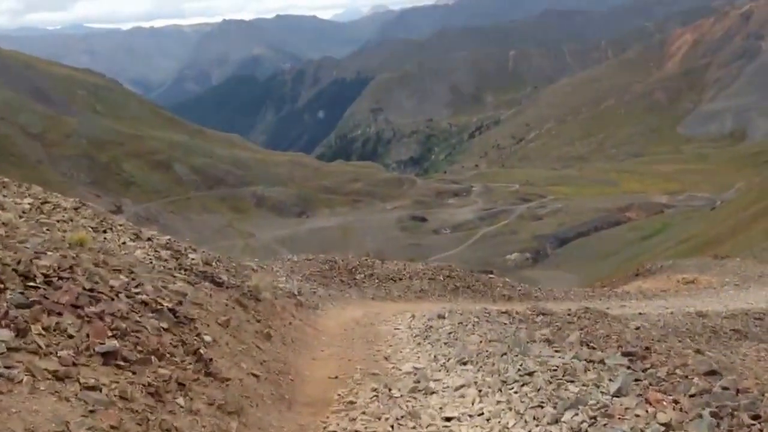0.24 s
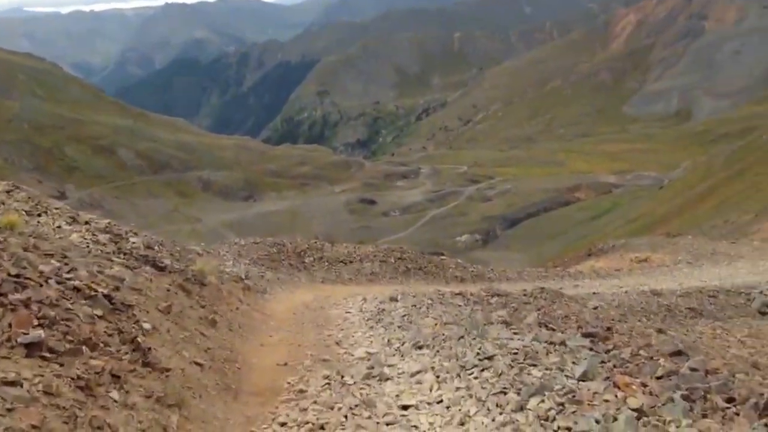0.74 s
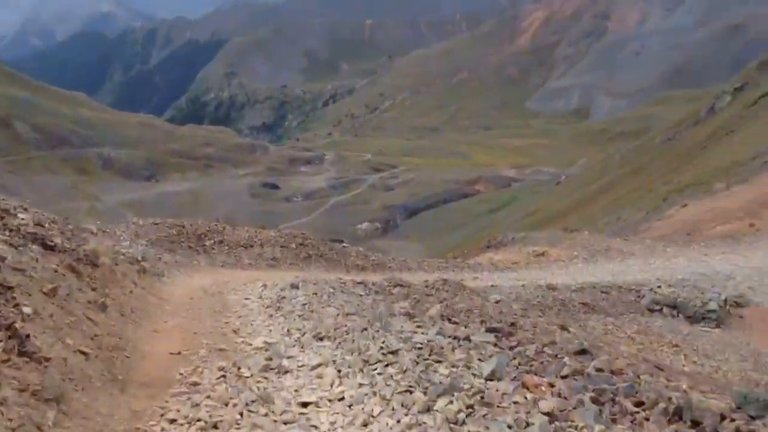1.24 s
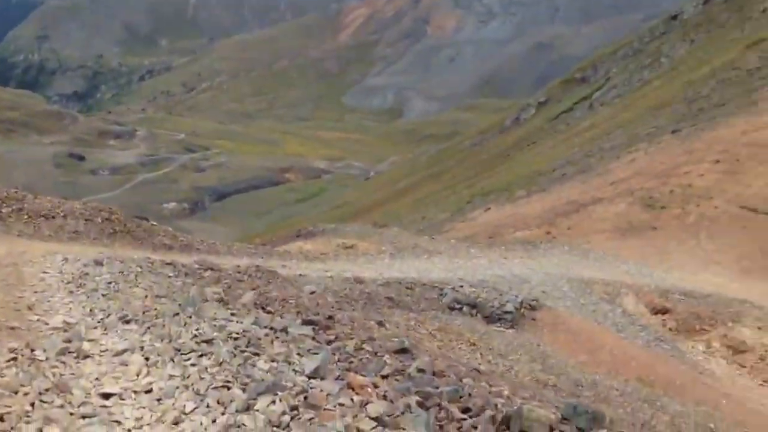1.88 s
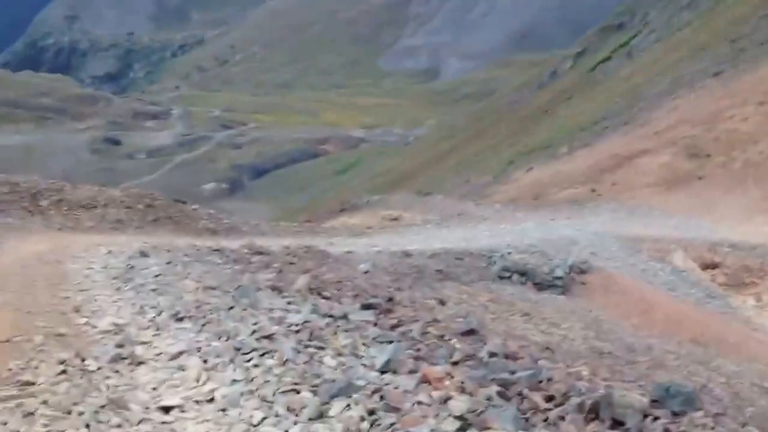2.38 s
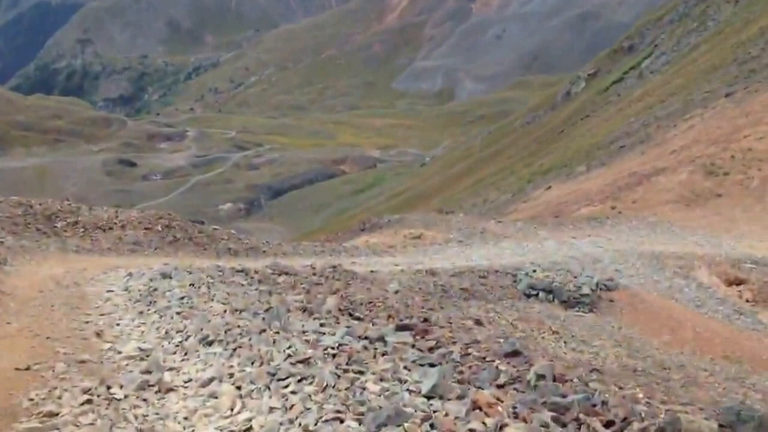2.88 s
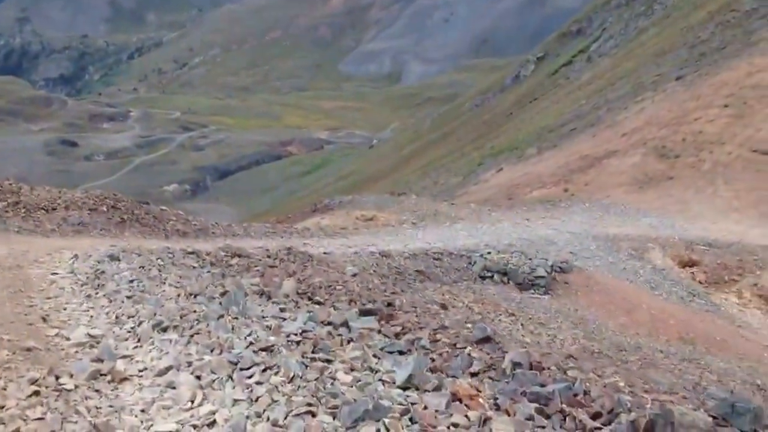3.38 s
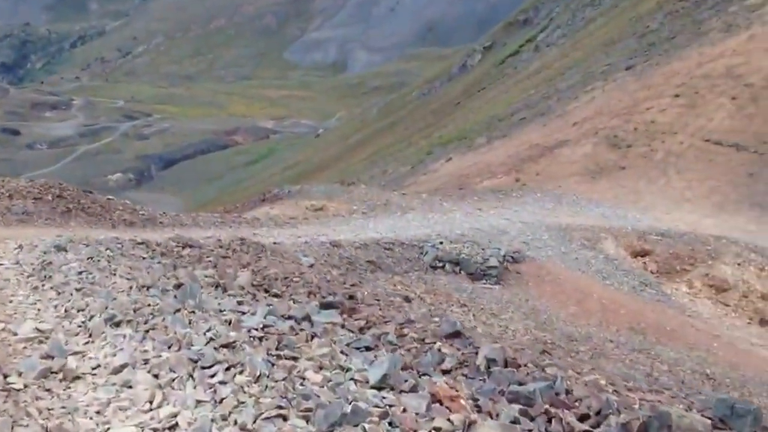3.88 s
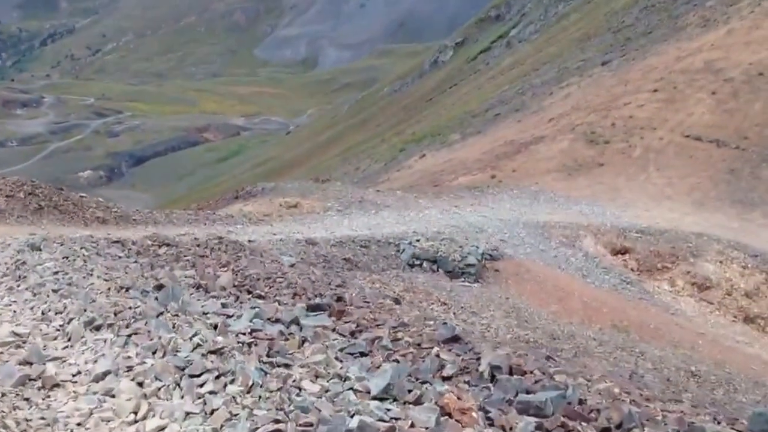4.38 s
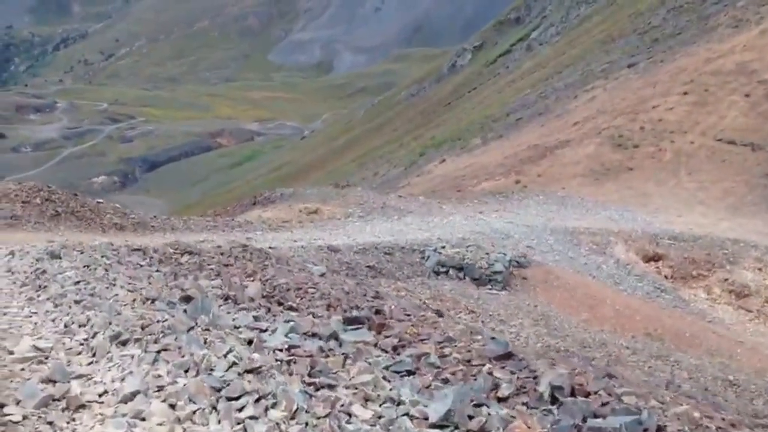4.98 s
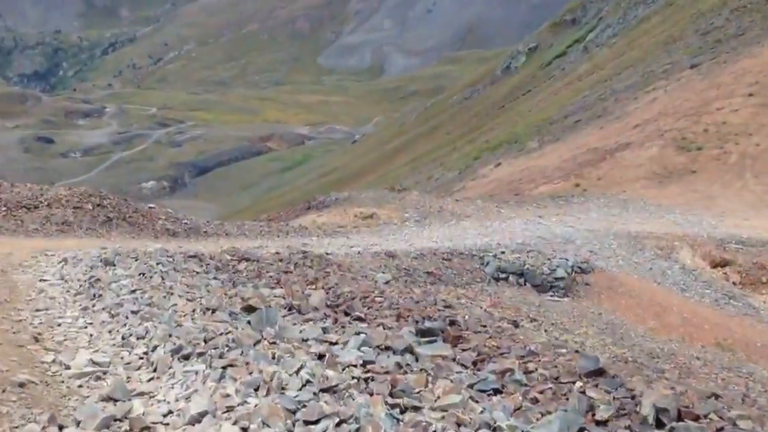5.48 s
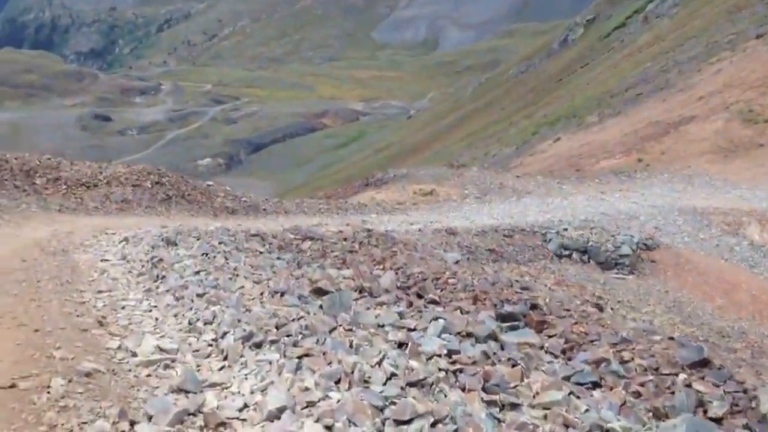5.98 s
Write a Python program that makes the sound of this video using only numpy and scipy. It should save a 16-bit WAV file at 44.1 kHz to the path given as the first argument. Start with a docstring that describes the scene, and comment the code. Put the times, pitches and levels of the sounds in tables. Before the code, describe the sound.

On board an off-road vehicle creeping down an open mountain track, tyres rumble and grind over loose sharp stones with fine clatter, crunches and slab scrapes. A low unsteady engine drone sits underneath. Shortly after two seconds a hard knock hits beside the microphone, the sound ducks and slowly recovers, then heavier body thuds follow.

```python
"""Off-road vehicle on loose stones

An off-road vehicle crawls down a track of loose, sharp stones, heard from on board.
Random stone contacts, filtered, make the tyre rumble, grind and fine clatter; all swell with the load.
Bursts of contacts ring stones that crunch, slabs that scrape and flakes that snap; drops thud the body.
The engine is three unsteady sines; hiss is filtered noise.
One hard knock close to the microphone makes the recorder's gain control duck and slowly recover."""
import sys
import numpy as np
from scipy import signal
from scipy.fft import rfft, irfft
from scipy.io import wavfile

SR = 44100
rng = np.random.default_rng(int(sys.argv[2]) if len(sys.argv) > 2 else 0)


def digitize_waveform(pressure):
    """Quantize a signal to 16-bit integers and store it at the path in sys.argv[1].

    Rows of a 2-D input are taken as channels; values are limited to [-1, 1].
    """
    field = np.atleast_2d(pressure).T
    bounded = np.clip(field, -1, 1)
    quanta = np.round(bounded * 32767).astype(np.int16)
    wavfile.write(sys.argv[1], SR, quanta)


N = 275184
TIME = np.arange(N) / SR
CUTOFF_HZ = 15400

# how hard the tyres bear on the stones: (time [s], load re usual [dB])
LOAD = [(0, -4.5), (.55, 0), (1.25, -2), (1.45, 5.5), (1.94, 3), (2.3, 4.5), (2.48, -9.5), (2.68, -1.5),
        (3.03, 2), (3.22, -3.5), (3.9, -2), (5.17, -2.6), (5.36, 11), (5.62, -0.5), (6.24, 2)]
# level of the fine clatter before load and gain control; raised after the knock, where the gain is down:
# (time [s], level [dB])
CLATTER_LEVEL = [(0, -52.5), (1.4, -53.5), (2.1, -59), (2.42, -42.5), (2.68, -55), (3.55, -54.5),
                 (4.2, -52.5), (6.24, -54.5)]
# bigger stones crushed by the tread:
# (time [s], clack before trim [dB], splinter before trim [dB], collapse length [s], clack pitch [Hz])
CRUNCH_EVENTS = [(0.084, -50, -58.5, 0.024, 1900), (0.316, -47, -61, .028, 2300),
                 (0.525, -46, -62, 0.0077, 1278), (0.551, -50, -62.5, 0.014, 2330),
                 (0.642, -55, -63, 0.01, 2030), (0.81, -45.5, -56, 0.011, 2870),
                 (0.948, -44, -58.5, 0.0066, 2410), (1.308, -48, -58, 0.03, 3000),
                 (1.378, -47, -64, .03, 2470), (1.413, -49, -66, 0.082, 2040),
                 (1.677, -47.5, -53.5, 0.027, 2210), (1.914, -50, -58.5, 0.035, 2700),
                 (1.96, -51, -63, 0.0062, 2340), (2.042, -53, -60.5, 0.034, 2670),
                 (2.47, -51, -59, 0.057, 3800), (2.546, -56, -60.5, .011, 2750),
                 (2.835, -52.5, -66, 0.042, 2590), (3.738, -54, -72, 0.0097, 2920),
                 (3.828, -49, -57, 0.014, 2160), (4.06, -45.5, -58.5, 0.013, 1810),
                 (4.094, -50, -68, 0.018, 2200), (4.581, -44, -53.5, 0.014, 1700),
                 (4.708, -52, -68, 0.014, 2600), (4.749, -52, -62.5, 0.011, 2660),
                 (4.883, -47.5, -72, 0.033, 2350), (5.019, -47, -57, 0.045, 2610),
                 (5.045, -46, -61, .022, 2350), (5.154, -51, -65, 0.03, 2300),
                 (5.256, -49, -61, 0.009, 2300), (5.373, -45, -52.5, 0.012, 2105),
                 (5.887, -48.5, -69, 0.013, 2300), (6.005, -54.5, -74, .008, 2600),
                 (6.058, -47.5, -60.5, 0.082, 2280)]
# tyres dropping off bigger stones: (time [s], level [dB], contact brightness [Hz])
THUD_EVENTS = [(0.176, -43.5, 447), (0.32, -34, 300), (0.526, -35, 990), (0.608, -38.5, 750),
               (1.413, -34, 437), (1.571, -36, 447), (1.678, -35.5, 495), (2.472, -35, 520),
               (2.548, -33, 540), (2.92, -39, 600), (3.001, -36, 420), (3.056, -26, 170), (3.119, -35, 510),
               (3.21, -37.5, 380), (3.427, -36, 405), (3.454, -25, 312), (3.829, -32, 430),
               (3.97, -32, 216), (4.148, -37.5, 560), (4.33, -29, 437), (4.416, -33.5, 188),
               (4.579, -30, 290), (4.86, -33, 216), (5.373, -23.5, 396), (5.398, -28, 284),
               (6.074, -35.5, 517)]
# slabs shoved along under the tread: (time [s], level [dB], length [s])
SCRAPE_EVENTS = [(0.548, -40, 0.047), (0.975, -45.5, 0.049), (1.411, -43, 0.057), (1.575, -41, .055),
                 (1.68, -35.5, 0.058), (1.743, -41, .09), (1.928, -39, 0.028), (2.033, -39, 0.044),
                 (4.878, -41, .03), (5.25, -42, .045), (6.06, -40.5, .075)]
# thin flakes that snap with a bright tick: (time [s], level [dB])
FLAKE_EVENTS = [(1.677, -62), (4.062, -56), (5.651, -54)]

# modes of the vehicle's body, before contact weighting: (frequency [Hz], gain [dB], t60 [s])
BODY_MODES = [(154, -11, 0.073), (212, -2, 0.095), (281, -5, 0.13), (380, 4.5, 0.054), (441, -6, 0.12),
              (539, 1.5, 0.08), (664, -2, 0.036), (733, -0.5, 0.039), (930, 3.5, 0.019)]
# modes of the thing knocked beside the microphone, re crack peak: (frequency [Hz], gain [dB], t60 [s])
KNOCK_MODES = [(252, -8.5, 0.088), (405, -32.5, 0.17), (654, -43, 0.037)]

# tread drumming on the body: (frequency [Hz], relative gain [dB])
RUMBLE_SPECTRUM = [(30, -37), (70, -17), (88, -19.5), (99, -9.5), (110, -13.5), (130, -1.5), (160, 1.5),
                   (190, -3), (218, 1), (260, -6.5), (320, -10.5), (450, -18), (900, -54.5)]
# grinding of the stone bed, also grit: (frequency [Hz], relative gain [dB])
GRIND_SPECTRUM = [(200, -26.5), (320, -14.5), (372, 2.5), (430, -1.5), (530, -3), (700, -8.5), (920, -15.5),
                  (1060, -27.5), (1230, -16), (2000, -50), (5000, -32.5), (15000, -56)]
# fine clatter, also scrape grit: (frequency [Hz], relative gain [dB])
CLATTER_SPECTRUM = [(900, 4.5), (1230, 0.5), (1900, 4), (2800, -1.5), (4000, -7), (6000, -12),
                    (9000, -15.5), (15000, -55)]
# body of a crunch: (frequency [Hz], relative gain [dB])
CLACK_SPECTRUM = [(900, 4.5), (1300, -2.5), (3400, -8.5), (10000, -22)]
# bright part of a crunch: (frequency [Hz], relative gain [dB])
SPLINTER_SPECTRUM = [(1500, -34), (3200, 8.5), (4300, 7), (7500, -5), (15000, -23)]
# crack of the knock: (frequency [Hz], relative gain [dB])
CRACK_SPECTRUM = [(40, -31), (130, -13), (220, 11.5), (620, 8.5), (920, 1), (1080, -4.5), (1300, 0.5),
                  (2000, -3.5), (4000, -15.5), (7000, -28.5), (15000, -55)]
# background hiss: (frequency [Hz], relative gain [dB])
HISS_SPECTRUM = [(500, -9), (3000, 12.5), (6000, 5.5), (15000, 0.5)]

# rolling layers: level at the usual load, and dB gained per dB of load
RUMBLE_DB, RUMBLE_DB_PER_LOAD_DB = -39.5, 0.55
GRIND_DB, GRIND_DB_PER_LOAD_DB = -48, 0.75
CLATTER_DB_PER_LOAD_DB = 0.56
CLIMB_LOAD_DB, CLIMB_S = -2, 0.031  # lull before a slab: depth; lead and width
CLACK_TRIM_DB, SPLINTER_TRIM_DB = 2.5, 6.0
SNAP_SHARE, TRICKLE_S = 0.32, 0.04  # first snap re all contacts; decay of the trickle
# small crunches, levels before trim
SMALL_PER_S, SMALL_CLACK_DB, SMALL_SPLINTER_DB, SMALL_LENGTH_S = 11, -58.5, -72, 0.007
REBOUND_S, REBOUND_SHARE = 0.00542, 0.38  # second contact of a thud, re the first
BODY_SPREAD_OCTAVES = 0.05  # scatter of the modes from blow to blow
SLAB_LOW_HZ, SLAB_HIGH_HZ, SCRAPE_GRIT_SHARE = 302, 940, 0.23
KNOCK_S, KNOCK_DB, PRE_SWELL_DB = 2.3193, 0.5, -14.5
ENGINE_DB, FIRING_HZ, HISS_DB = -48.5, 48.74, -62


def from_db(db):
    """Decibels to gain."""
    return 10 ** (np.asarray(db) / 20)


def rms_one(x):
    """Scale to an rms of 1."""
    return x / np.sqrt(np.mean(x ** 2) + 1e-20)


def onset_one(x):
    """Scale a hit so that its first 20 ms have an rms of 1."""
    return x / np.sqrt(np.mean(x[:SR // 50] ** 2) + 1e-20)


def add(track, start_s, sound):
    """Mix a sound into the track at start_s."""
    start = max(0, round(start_s * SR))
    track[start:start + len(sound)] += sound[:N - start]


def drift(corner_hz):
    """Slow random wander with an rms of 1: two-pole low-passed noise."""
    step = 40  # samples between drawn values
    r = np.exp(-2 * np.pi * corner_hz * step / SR)
    noise = rng.standard_normal(N // step + 2002)
    slow = signal.lfilter([1], [1, -2 * r, r * r], noise)[2000:]  # drop the run-in
    return np.interp(np.arange(N) / step, np.arange(len(slow)), rms_one(slow))


def colour(x, spectrum, size=4096):
    """Causal minimum-phase filter with the given spectrum, built by folding its cepstrum."""
    hz, db = np.transpose(spectrum)
    grid_hz = np.maximum(np.fft.rfftfreq(size, 1 / SR), 1)
    gain_db = np.interp(np.log(grid_hz), np.log(hz), db)
    cepstrum = irfft(np.log(from_db(gain_db)))
    cepstrum[1:size // 2] *= 2
    cepstrum[size // 2 + 1:] = 0
    impulse = irfft(np.exp(rfft(cepstrum)))
    return signal.fftconvolve(x, impulse)[:len(x)]


def band(x, order, low_hz, high_hz):
    """Butterworth band-pass."""
    sos = signal.butter(order, [low_hz, high_hz], "band", fs=SR, output="sos")
    return signal.sosfilt(sos, x)


def ring(clicks, hz, t60_s):
    """Two-pole resonator: a unit click starts a decaying sine of height 1."""
    r = from_db(-60 / (t60_s * SR))
    w = 2 * np.pi * min(hz, CUTOFF_HZ) / SR
    return signal.lfilter([0, np.sin(w)], [1, -2 * r * np.cos(w), r * r], clicks + 1e-18)


def grains(per_s, spread_db, size):
    """Stone contacts at random moments and of random sign, most small and a few large."""
    strength = from_db(spread_db * np.minimum(rng.exponential(1, size), 4))
    hits = rng.random(size) < per_s / SR
    return hits * strength * rng.choice([-1, 1], size)


def stones(clicks, low_hz, high_hz, cycles, ring_share, count):
    """Each contact is a dry snap plus the ring of one of several stones, t60 in cycles."""
    dealt = rng.integers(0, count, len(clicks))
    places = (np.arange(count) + rng.random(count)) / count
    pitches_hz = low_hz * (high_hz / low_hz) ** places
    rings = sum(ring(clicks * (dealt == k), hz, cycles / hz) * hz for k, hz in enumerate(pitches_hz))
    share = np.clip(ring_share, 0, 1)
    return np.sqrt(share) * rms_one(rings) + np.sqrt(1 - share) * rms_one(clicks)


def rolling():
    """The tread drums the body, grinds over the bed and stirs a fine clatter; all swell with the load."""
    load_db = np.interp(TIME, *np.transpose(LOAD)) + climb_load_db()
    jolt_db = drift(28)

    # separate bumps from the tread blocks stand out of a finer patter
    bumps = rms_one(grains(90, 1.0, N)) + 1.17 * rms_one(grains(2000, 0.7, N))
    rumble_db = RUMBLE_DB + RUMBLE_DB_PER_LOAD_DB * load_db + 0.5 * jolt_db + 2.1 * drift(7.7)
    rumble = rms_one(colour(bumps, RUMBLE_SPECTRUM)) * from_db(rumble_db)

    grind_db = GRIND_DB + GRIND_DB_PER_LOAD_DB * load_db + jolt_db
    grind = rms_one(colour(grains(1100, 2.9, N), GRIND_SPECTRUM)) * from_db(grind_db)

    clatter_db = np.interp(TIME, *np.transpose(CLATTER_LEVEL))
    clatter_db = clatter_db + CLATTER_DB_PER_LOAD_DB * load_db + 1.7 * jolt_db
    clatter = fine_clatter(per_s=210, clump_db=2.5, cycles=19.6) * from_db(clatter_db)
    return rumble + grind + clatter


def climb_load_db():
    """The load dips briefly just ahead of each scrape, as the tyre rides up on the slab."""
    dips = (np.exp(-((TIME - s + CLIMB_S) / CLIMB_S) ** 2) for s, _, _ in SCRAPE_EVENTS)
    return CLIMB_LOAD_DB * sum(dips)


def fine_clatter(per_s, clump_db, cycles, count=14):
    """Stones of each size rub in clumps of their own, so the clatter shifts in pitch; dry ticks between."""
    rings = np.zeros(N)
    for hz in np.geomspace(900, 7000, count):
        clumps = from_db(clump_db * np.minimum(drift(16.0), 2))
        rubs = grains(per_s, 0.85, N) * clumps
        rings += ring(rubs, hz, cycles / hz) * np.sqrt(hz)
    ticks = grains(1400, 2.7, N)
    return rms_one(colour(rms_one(rings) + 1.2 * rms_one(ticks), CLATTER_SPECTRUM))


def crunches(rows, size=8000):
    """A stone gives way in a snap, a burst and a trickle of contacts: pitched clack, bright splinters."""
    out, t = np.zeros(N), TIME[:size]
    for start_s, clack_db, splinter_db, length_s, hz in rows:
        burst = grains(2600, 1.7, size) * np.exp(-(t / length_s) ** 2)
        trickle = grains(550, 1.54, size) * np.exp(-t / TRICKLE_S)
        contacts = burst + trickle
        contacts[0] = SNAP_SHARE * np.linalg.norm(contacts)
        clack = stones(contacts, hz / 1.4, hz * 1.4, cycles=82, ring_share=0.85, count=6)
        clack = onset_one(colour(clack, CLACK_SPECTRUM))
        splinter = stones(contacts, 3600, 9460, cycles=104, ring_share=0.33, count=8)
        splinter = onset_one(colour(splinter, SPLINTER_SPECTRUM))
        add(out, start_s, from_db(clack_db + CLACK_TRIM_DB) * clack)
        add(out, start_s, from_db(splinter_db + SPLINTER_TRIM_DB) * splinter)
    return out


def small_crunches():
    """One small stone gives way at random in each equal slot of time; rows as in CRUNCH_EVENTS."""
    return [((k + rng.random()) / SMALL_PER_S, SMALL_CLACK_DB, SMALL_SPLINTER_DB,
             SMALL_LENGTH_S, rng.uniform(1365, 3665))
            for k in range(int(SMALL_PER_S * N / SR))]


def thuds(size=9000):
    """A tyre drops off a stone, rebounds and rings the body; the stone then grinds and settles."""
    out, t = np.zeros(N), TIME[:size]
    for start_s, level_db, contact_hz in THUD_EVENTS:
        push = 0.09 * grains(560, 1, size) * np.exp(-t / 0.013)
        push[0] = 1
        push[int(REBOUND_S * rng.uniform(0.9, 1.1) * SR)] += REBOUND_SHARE
        # the soft tyre rounds the blow, and the panels radiate little deep bass
        push = band(push, 3, 130, max(1.5 * contact_hz, 240))
        shares = from_db(rng.normal(0, 2, len(BODY_MODES)))
        detune = 2 ** (BODY_SPREAD_OCTAVES * rng.standard_normal(len(BODY_MODES)))
        body = np.zeros(size)
        for k, (hz, db, t60_s) in enumerate(BODY_MODES):
            # a harder contact is shorter and feeds the low modes less
            weight = hz / (hz + contact_hz)
            body += shares[k] * from_db(db) * weight * ring(push, hz * detune[k], t60_s)
        grit = colour(grains(1500, 1, size) * np.exp(-t / 0.026), GRIND_SPECTRUM)
        thud = onset_one(body) + contact_hz / 1500 * onset_one(grit)
        add(out, start_s, from_db(level_db) * thud)
    return out


def scrapes(size=9000):
    """A slab sticks and slips over its neighbours with dull rings of its own; grit crackles in step."""
    out, t = np.zeros(N), TIME[:size]
    for start_s, level_db, length_s in SCRAPE_EVENTS:
        slips = grains(1300, 2.7, size)
        slab = stones(slips, SLAB_LOW_HZ, SLAB_HIGH_HZ, cycles=6.4, ring_share=0.33, count=7)
        slab = band(slab, 2, SLAB_LOW_HZ, SLAB_HIGH_HZ)
        grit = colour(slips, CLATTER_SPECTRUM)
        rub = rms_one(slab) + SCRAPE_GRIT_SHARE * rms_one(grit)
        add(out, start_s, from_db(level_db) * rub * np.exp(-(t / length_s) ** 4))
    return out


def flakes(size=4000):
    """A thin flake breaks in a quick run of dry, bright cracks."""
    out, t = np.zeros(N), TIME[:size]
    for start_s, level_db in FLAKE_EVENTS:
        cracks = grains(3000, 1, size) * np.exp(-(t / 0.02) ** 2)
        add(out, start_s, from_db(level_db) * onset_one(band(cracks, 2, 5000, 10500)))
    return out


def knock(size=9000):
    """A brief gritty 3 kHz noise swells just before the hard knock, which chatters to rest."""
    out, t = np.zeros(N), TIME[:size]
    blow = signal.unit_impulse(size)
    chatter = grains(3400, 1, size) * np.exp(-t / 0.0062)
    crack_peak = np.abs(colour(blow, CRACK_SPECTRUM)).max()
    crack = colour(blow + 0.12 * chatter, CRACK_SPECTRUM) / crack_peak
    modes = sum(from_db(db) * ring(blow, hz, t60_s) for hz, db, t60_s in KNOCK_MODES)
    add(out, KNOCK_S, -from_db(KNOCK_DB) * (crack + modes))  # polarity inverted

    grit = grains(6400, 0.65, size)
    grit_ring = ring(grit, 3000, 0.055)
    pre_swell = rms_one(colour(grit, GRIND_SPECTRUM)) + 0.55 * rms_one(grit_ring)
    ahead_s = t[-1] - t
    rise = np.exp(-ahead_s / 0.0038) * np.tanh(ahead_s / 0.00072)
    add(out, KNOCK_S - size / SR, from_db(PRE_SWELL_DB) * pre_swell * rise)
    return signal.sosfilt(signal.butter(2, 120, "high", fs=SR, output="sos"), out)


def engine():
    """A low, unsteady drone on the second to fourth multiples of the firing rate."""
    rate_hz = FIRING_HZ * (1 + 0.013 * drift(2.037))
    phase = 2 * np.pi * np.cumsum(rate_hz) / SR
    drone = np.zeros(N)
    for multiple, db in [(2, -11), (3, 0), (4, -9)]:
        drone += from_db(db + 4.6 * drift(22.0)) * np.sin(multiple * phase)
    return from_db(ENGINE_DB) * rms_one(drone)


def hiss():
    """Faint, even filtered noise."""
    return from_db(HISS_DB) * rms_one(colour(rng.standard_normal(N), HISS_SPECTRUM))


def scene():
    """Everything summed at the one microphone."""
    stone_events = crunches(CRUNCH_EVENTS + small_crunches()) + thuds() + scrapes() + flakes()
    mono = rolling() + stone_events + knock() + engine() + hiss()
    return mono[None]


def gain_control(x, attack_s=0.022, release_s=0.71):
    """A peak over -7 dB re full scale soon turns the gain down; it creeps back afterwards."""
    over_db = np.clip(20 * np.log10(np.abs(x).max(axis=0) + 1e-9) + 7, 0, None)
    wanted_db = np.minimum(3 * over_db, 13.8)
    # hold each peak reduction, decaying with the release time
    fade = np.exp(-TIME / release_s)
    held_db = np.maximum.accumulate(wanted_db / fade) * fade
    r = np.exp(-1 / (attack_s * SR))
    reduction_db = signal.lfilter([1 - r], [1, -r], held_db)
    return x * from_db(-reduction_db)


def record(dry):
    """Gain control, overload at full scale, then the top is cut."""
    clipped = np.clip(gain_control(dry), -1, 1)
    low_pass = signal.ellip(12, 0.1, 80, CUTOFF_HZ, fs=SR, output="sos")
    return signal.sosfilt(low_pass, clipped)


dry = scene()
out = record(dry)
digitize_waveform(out)
```